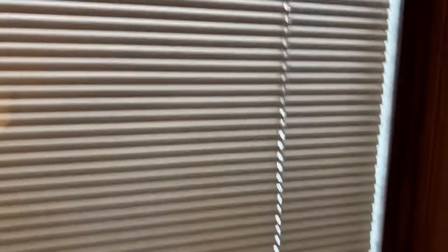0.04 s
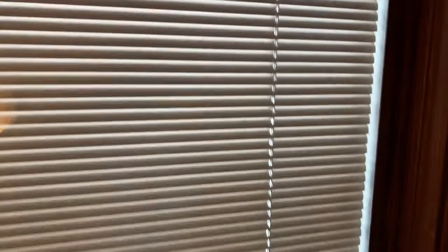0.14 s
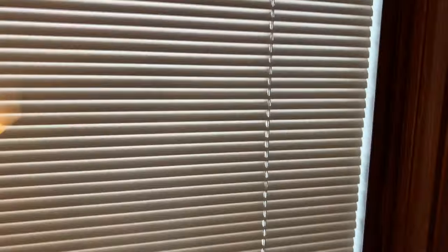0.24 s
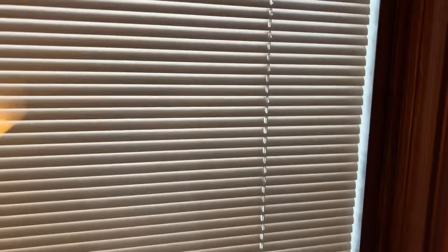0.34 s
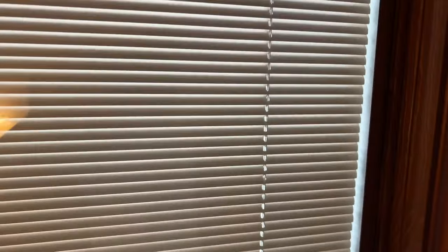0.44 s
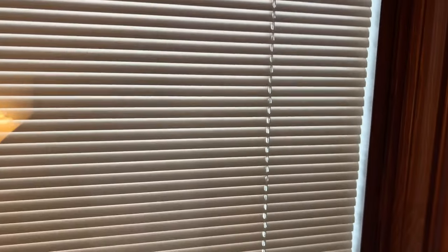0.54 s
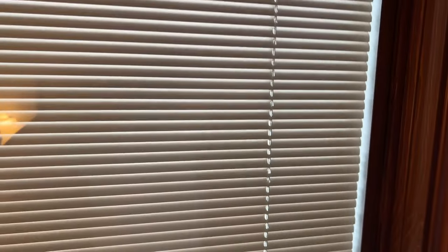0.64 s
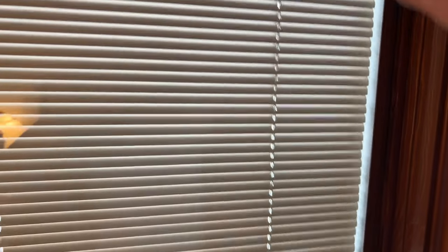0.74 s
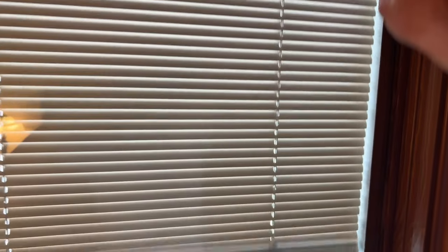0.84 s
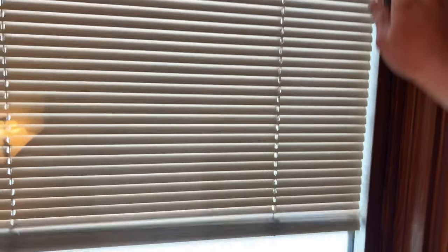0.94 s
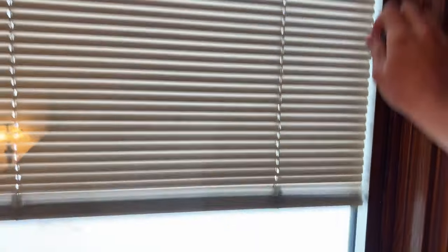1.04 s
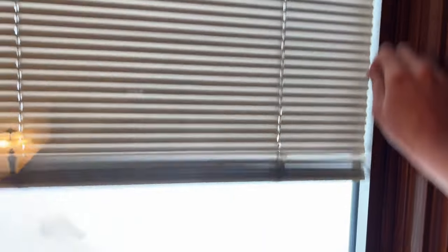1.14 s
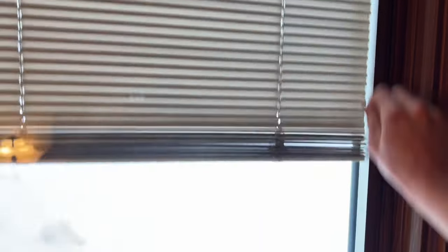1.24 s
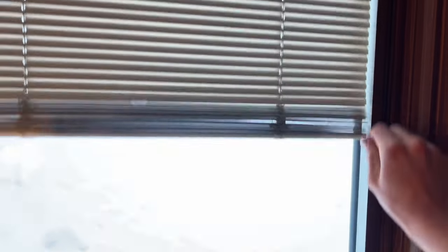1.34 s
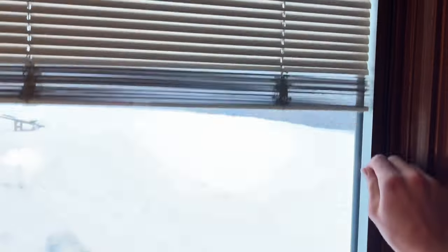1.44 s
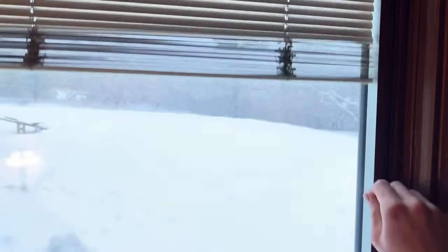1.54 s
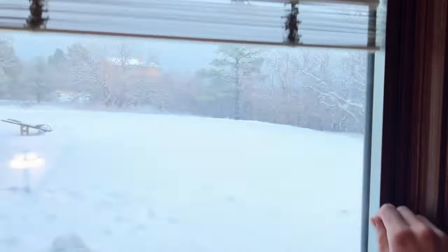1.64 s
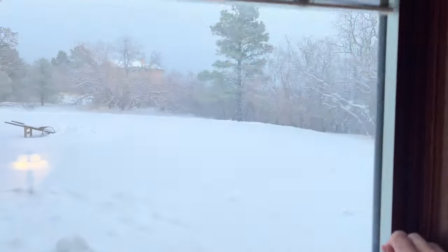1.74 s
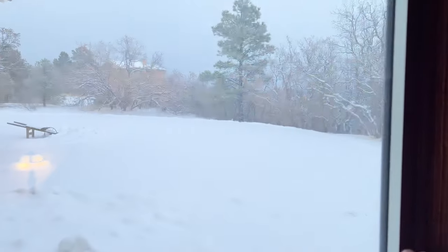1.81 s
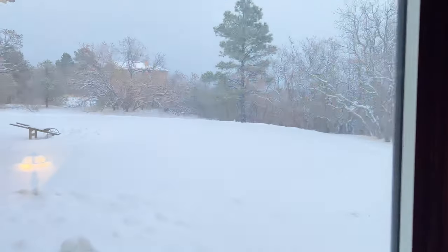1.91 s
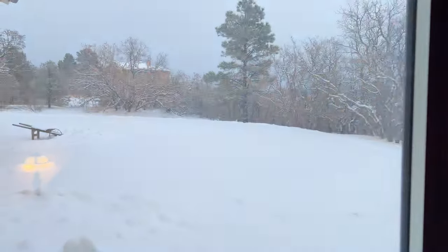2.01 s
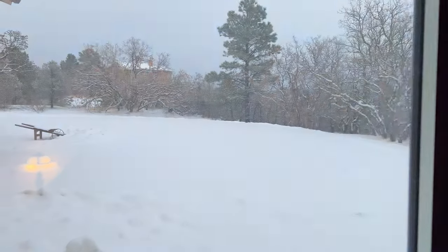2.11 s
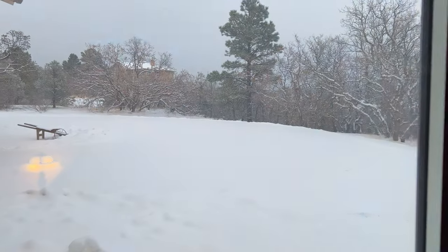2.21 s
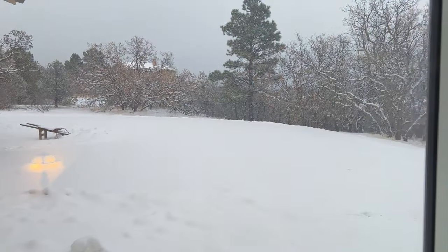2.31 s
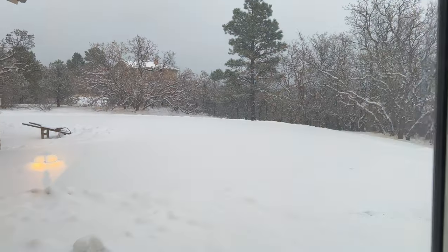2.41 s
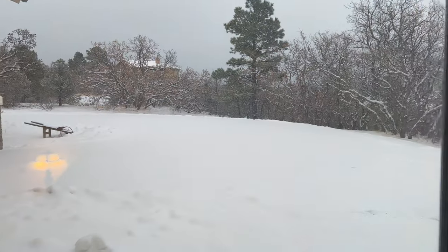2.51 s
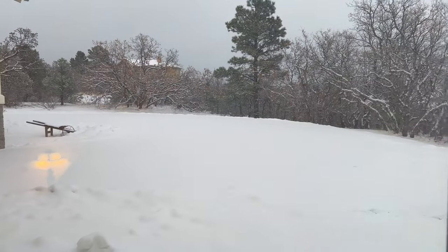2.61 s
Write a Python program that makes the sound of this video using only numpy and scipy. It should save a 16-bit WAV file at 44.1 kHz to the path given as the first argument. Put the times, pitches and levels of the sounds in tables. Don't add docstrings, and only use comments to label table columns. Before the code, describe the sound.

Slatted window blind is pulled up indoors, slats clattering and knocking over a low rolling rumble

```python
import sys
import numpy as np
from scipy import signal
from scipy.fft import rfft, irfft, next_fast_len
from scipy.io import wavfile
from scipy.ndimage import uniform_filter1d

SR = 44100
rng = np.random.default_rng(int(sys.argv[2]) if len(sys.argv) > 2 else 0)


def unload_wav(signal):
    wavfile.write(
        sys.argv[1],
        SR,
        np.round(np.clip(np.atleast_2d(signal).T, -1, 1) * 32767).astype(np.int16),
    )


def elevation(decibels):
    levels = np.asarray(decibels, float)
    return 10 ** (levels / 20)


N = 116865
EDGE_LEAD_S = 0.0003


def evened(x):
    return x / np.sqrt(np.mean(x ** 2) + 1e-20)


def read(points, hz):
    f, value = np.transpose(points)
    return np.interp(np.log(hz + 1), np.log(f + 1), value)


def colour(x, gain):
    size = next_fast_len(N + 4096)
    return irfft(rfft(x, size) * gain(np.fft.rfftfreq(size, 1 / SR)), size)[..., :N]


def resonate(x, hz, width_hz):
    turn = np.exp(2j * np.pi * np.cumsum(hz * np.ones(len(x))) / SR)
    r = np.exp(-np.pi * width_hz / SR)
    return 2 * (turn * signal.lfilter([1 - r], [1, -r], x / turn + 1e-18)).real


def drift(seconds):
    size = max(round(seconds * SR), 1)
    return evened(uniform_filter1d(uniform_filter1d(rng.standard_normal(N), size), size))


def steady(x):
    power = abs(uniform_filter1d(x ** 2, round(0.09 * SR)))
    return evened(x / (power + 1e-3) ** (0.8 / 2))


def pull(column):
    # time in seconds, effort in dB, drum pitch in Hz, scrape in dB.
    course = [(0, -49.5, 161, -23), (0.091, -40, 176, -4.5), (.3, -31.5, 178, -9), (.52, -26.5, 168, -4.5),
              (0.659, -20, 168, -4.5), (.79, -21, 255, -5), (0.991, -20, 182, -4.5), (1.079, -17, 301, -2),
              (1.17, -19, 293, -1.5), (1.29, -19, 253.6, -2), (1.55, -20.5, 261, -4.5),
              (1.9, -19, 273.7, -2.5), (2.038, -22, 266, -5), (2.085, -24.5, 185, -4.5),
              (2.281, -22, 172, -9), (2.47, -39, 145, -17), (2.57, -36.5, 178, -15), (2.65, -47, 164, -23)]
    return np.interp(np.arange(N) / SR, np.transpose(course)[0], np.transpose(course)[column])


def busy():
    return elevation(pull(column=3))


def floor():
    # frequency in Hz, density in dB per Hz.
    air_spectrum = [(22, -25), (50, 8.5), (170, -0.5), (1400, -8.5), (3400, -37), (5400, -37), (9100, -41),
                    (15000, -51)]
    air = colour(rng.standard_normal(N), lambda hz: elevation(read(air_spectrum, hz)))
    return elevation(-38) * evened(air)


def handling():
    low = evened(colour(rng.standard_normal((2, N)), lambda hz: 1 / (1 + (hz / 70) ** 3)))
    high = evened(colour(rng.standard_normal(N), lambda hz: 1 - 1 / (1 + (hz / 7000) ** 6)))
    return elevation(-58) * low + elevation(-64) * high


def drum():
    # rail or frame mode in Hz, width in Hz, level in dB.
    rail_modes = [(68, 20, -33), (130.1, 15.8, -4), (172, 8.2, -4), (247, 18, -16), (306.1, 8.5, -7),
                  (361.2, 17.4, -5), (457, 21, -11.5), (608.6, 54, -7.5), (689, 27, -21)]
    low_hz, hum_db, rail_db = 195, -3, -4.5
    roll = rng.standard_normal(N) * elevation(3 * drift(0.0077))
    hz = pull(column=2)
    fast = np.log2(hz / low_hz)
    hum = steady(evened(resonate(resonate(roll, hz, 22), hz, 137)))
    hum = hum * elevation(hum_db + 3 * fast)
    rail = np.zeros(N)
    for mode_hz, width_hz, db in rail_modes:
        mode = steady(evened(resonate(resonate(roll, mode_hz, width_hz), mode_hz, 3 * width_hz)))
        rail += elevation(db + 3 * fast * np.log2(mode_hz / low_hz)) * mode
    return elevation(pull(column=1)) * (hum + elevation(rail_db) * evened(rail))


def scrape():
    # frequency in Hz, density in dB per Hz.
    rub_spectrum = [(250, -45), (700, -11), (1600, -7), (2800, -29), (3550, -22), (4400, -27), (7500, -26),
                    (14500, -34)]
    split_hz, level_db = 4600, -33.5
    rub = rng.standard_normal(N) * elevation(0.23 * drift(0.11))
    hiss = evened(colour(rub, lambda hz: elevation(read(rub_spectrum, hz))))
    low = colour(hiss, lambda hz: 1 / (1 + (hz / split_hz) ** 12))
    effort = elevation(0.52 * (pull(column=1) + 28.0))
    return elevation(level_db) * busy() * (hiss - low + low * effort)


def ring(modes, tint_db, detune, rise_s):
    t = np.arange(3000) / SR
    hz, db, t60 = np.transpose(modes)[:, :, None]
    count = len(modes)
    sense = (-1) ** np.arange(count)[:, None]
    decay = elevation(db + tint_db[:count, None] - 60 * t / t60)
    x = (sense * decay * np.sin(2 * np.pi * hz * detune[:count, None] * t)).sum(0)
    x = x * (1 - np.exp(-(t / rise_s) ** 2))
    return x / abs(x).max()


def contact(draws, grit, edge_db, scrape_ms, snap_db):
    # mode in Hz, level in dB, t60 in seconds.
    slat_modes = [(609.5, -17, 0.073), (943, -2.5, 0.018), (1220, -1.5, 0.018), (1445, 4, 0.0062),
                  (1812, 2, 0.0076), (1946, 0, 0.0076), (2243, -7, 0.0021), (3500, -19, 0.0088)]
    # mode in Hz, level in dB, t60 in seconds.
    edge_modes = [(3430, -3.5, 0.0073), (5229, -3, 0.014), (5610, -8, 0.021), (6540, 2, 0.0035),
                  (7500, -7, 0.0043), (9220, -15, 0.012), (11590, -3.5, 0.0034), (14600, -20.5, 0.0034),
                  (15220, -10.5, .0086)]
    tint_db, snap_low_hz, snap_lift_db = 0.5, 6000, 4
    t = np.arange(len(grit)) / SR * 1000 / max(scrape_ms, .2)
    rub = grit * t * np.exp(-2 * t)
    edge = np.convolve(rub, ring(edge_modes, tint_db * draws[0], 1 + 0.011 * draws[1], 1 / SR))[:3000]
    burst = grit * np.minimum(4 * t, 1) * (np.exp(-1.3 * t) + 0.16 * np.exp(-t / 8))
    high = signal.butter(2, snap_low_hz, "high", fs=SR, output="sos")
    snap = np.pad(signal.sosfilt(high, burst), (0, 3000 - len(rub)))
    body = ring(slat_modes, tint_db * draws[2], 1 + 0.04 * draws[3], 0.00018)
    body = np.roll(body, round(EDGE_LEAD_S * SR))
    edge = elevation(edge_db) * edge / abs(edge).max()
    snap = elevation(snap_db + snap_lift_db) * snap / abs(snap).max()
    return body + edge + snap


def rattle():
    rate_per_s, spread_db, level_db = 280, 4, -31.5
    size = elevation(spread_db * np.minimum(rng.exponential(1, N), 4))
    size = size * (rng.random(N) < rate_per_s / SR * np.exp(0.5 * drift(0.012)))
    slat = rng.integers(0, 24, N)
    out = np.zeros(N)
    for k in range(24):
        draws, grit = 1.09 * rng.standard_normal((4, 9)), rng.standard_normal(1000)
        tap = contact(draws, grit, edge_db=-18 + 3 * rng.standard_normal(), scrape_ms=6, snap_db=-14)
        out += signal.oaconvolve(size * (slat == k), tap)[:N]
    effort_db = 0.45 * (pull(column=1) + 16.5)
    return elevation(level_db + effort_db) * busy() ** 1.02 * evened(out)


def knocks():
    # time in seconds, body in dB, edge in dB over body, snap in dB over body.
    body_knocks = [(0.062, -29, -10, -12), (0.172, -27, -19, -22), (0.235, -19.5, -14, -24),
                   (0.258, -21, -14, -40), (0.385, -11, -17.5, -20), (0.419, -10, -23, -11.5),
                   (0.437, -12, -28, -22), (0.551, -7, -17, -14), (0.571, -14, -22, -25),
                   (0.638, -28, -6, -27), (0.791, -6, -9.5, -11.5), (0.826, -10, -15, -25),
                   (0.941, -9, -13, -34), (1.044, -1, -15, -17.5), (1.075, -16.5, -24, -33),
                   (1.177, -14.5, -12, -29), (1.261, -8, -2.5, -19), (1.407, -27, -14, -20),
                   (1.47, -20, -8.5, -12), (1.511, -12.5, -7, -28), (1.592, -17.5, -20, -25),
                   (1.714, -17.5, -29, -28), (1.746, -8, -15, -22), (1.54, -18, -25, -30),
                   (1.829, -19, -11, -28), (1.877, -16.5, -2.5, -26), (1.935, -20, -23, -31),
                   (2.024, -29, -4, -28), (2.062, -22, -18, -29), (2.129, -19, -15, -31),
                   (2.31, -19, -27, -24), (2.421, -21.5, -25, -20), (2.532, -34, -15, -36),
                   (2.565, -31.5, -13, -20)]
    # time in seconds, edge in dB, scrape in ms, snap in dB over edge.
    edge_ticks = [(.1785, -33, 1.5, -16), (0.268, -37, 2.1, -21), (.7028, -23.5, 0.65, -13),
                  (0.9275, -32, 4.9, -19), (1.0216, -28, 2.4, -15), (1.122, -28.5, 3, -21),
                  (1.2336, -33, 1.7, -7), (1.294, -31, 0.86, -1), (1.4224, -21.5, 3.4, -16),
                  (1.494, -23, 3.2, -3), (1.531, -25, 1.8, -14), (1.6553, -25, 2, -16),
                  (1.6963, -18, 2.9, -6.5), (1.7657, -29, 3.4, -19), (1.8282, -29.5, 2.7, 1),
                  (1.9766, -35, 3, -18), (2.304, -31, 1.8, -14)]
    knock_db, snap_ms, body_rise_s = -0.5, 0.6, 0.0003
    tick_body_db = -11
    rows = [(s, db + knock_db, edge_db, snap_ms, snap_db) for s, db, edge_db, snap_db in body_knocks]
    for s, db, ms, snap_db in edge_ticks:
        rows.append((s, db + tick_body_db, -tick_body_db, ms, snap_db - tick_body_db))
    out = np.zeros(N + 3000)
    for s, db, edge_db, ms, snap_db in rows:
        draws, grit = rng.standard_normal((4, 9)), rng.standard_normal(1000)
        at = round((s - EDGE_LEAD_S - body_rise_s) * SR)
        out[at:at + 3000] += elevation(db) * contact(draws, grit, edge_db, ms, snap_db)
    return out[:N]


def swish():
    hz, peak_s, length_s, level_db = 5820, 0.16, 0.069, -53.5
    air = evened(resonate(resonate(rng.standard_normal(N), hz, 360), hz, 600))
    return elevation(level_db) * np.exp(-((np.arange(N) / SR - peak_s) / length_s) ** 2) * air


def direct(x):
    # frequency in Hz, gain at the right port in dB.
    shadow = [(450, -1), (800, -21), (2000, -8), (5500, -10), (7000, -0.5), (9000, 7)]
    lag_s, lead_s, lead_hz = 0.0001498, 0.00039, 790

    def lag(hz):
        return np.exp(-2j * np.pi * hz * (lag_s - lead_s / (1 + (hz / lead_hz) ** 2)))

    return np.array([colour(x, lag), colour(x, lambda hz: elevation(read(shadow, hz)))])


def echoes(x):
    # delay in seconds, level at left port in dB, level at right port in dB.
    bounces = [(.0016, -22, -7), (.0029, -2.5, -6), (.0047, -14, -8), (.0068, -11, -10), (.0103, -10, -12)]
    dull = colour(x, lambda hz: 1 / (1 + (hz / 6500) ** 6))
    out = np.zeros((2, N))
    for s, left_db, right_db in bounces:
        out += elevation([[left_db], [right_db]]) * np.roll(dull, round(s * SR))
    return out


def tail():
    # frequency in Hz, t60 in seconds.
    decay = [(100, 0.36), (1000, 0.21), (5000, 0.23), (15000, 0.054)]
    # frequency in Hz, room level in dB.
    wet = [(40, -44), (250, -11.5), (600, -2), (1500, 3.5), (5000, 5.5), (7500, -6), (10000, -8.5),
           (15000, -2)]
    taps = np.zeros((2, SR // 2))
    at = np.arange(120, SR // 2 - 20, 20) + rng.integers(0, 20, (2, (SR // 2 - 121) // 20))
    np.put_along_axis(taps, at, rng.choice([-1., 1.], at.shape), 1)
    hz, t, z = signal.stft(taps, SR, nperseg=256)
    t60 = read(decay, hz)[:, None]
    gain = elevation(-60 * t / t60 + read(wet, hz)[:, None]) / np.sqrt(t60 * 160)
    return signal.istft(z * gain, SR, nperseg=256)[1]


def room(x, count=8):
    place = np.arange(N) / SR / 0.11
    out = np.zeros((2, N))
    for k in range(count):
        away = (place - k + count / 2) % count - count / 2
        share = np.cos(np.pi / 2 * np.clip(away, -1, 1))
        out += signal.fftconvolve((x * share)[None], tail(), axes=1)[:, :N]
    return out


def scene():
    small, large = rattle(), knocks()
    steady_part = floor() + drum() + scrape() + small + swish()
    send = elevation(-1.5) * colour(large, lambda hz: 1 / np.sqrt(1 + (hz / 3000) ** 2))
    return direct(steady_part + large) + echoes(small + large) + room(steady_part + send) + handling()


def band_limit(x):
    return signal.sosfilt(signal.butter(12, 16470, fs=SR, output="sos"), x)


def record(dry):
    # frequency in Hz, left minus right in dB.
    balance = [(25, -7), (80, 2.5), (270, 1.5), (700, 0), (2000, 6), (4500, 6), (7000, 4), (9000, 6.5)]

    def cut(hz):
        return 1 / (1 + (32 / (hz + 1)) ** 3) / (1 + (hz / 15900) ** 80)

    cavity = np.zeros(N)
    for peak_hz, width_hz in ((5220, 700), (5600, 260)):
        cavity += resonate(resonate(dry[0], peak_hz, width_hz), peak_hz, 2 * width_hz)
    left = colour(dry[0] + elevation(4) * cavity, lambda hz: cut(hz) * elevation(read(balance, hz) / 2))
    right = colour(dry[1], lambda hz: cut(hz) * elevation(-read(balance, hz) / 2))
    mix = np.clip(np.array([left, right]), -1, 1)
    return band_limit(mix)


dry = scene()
out = record(dry)
unload_wav(out)
```